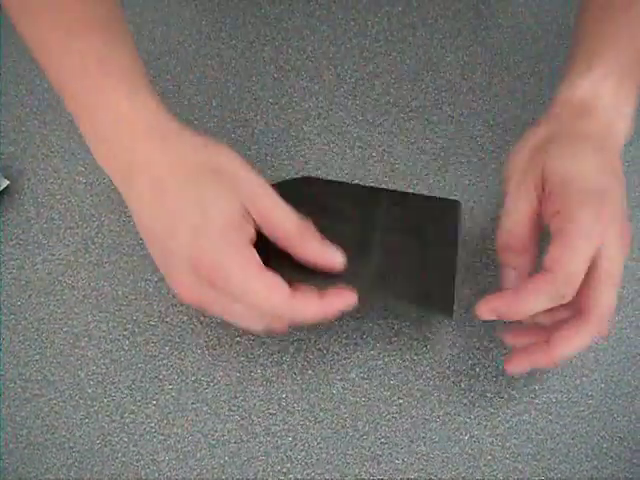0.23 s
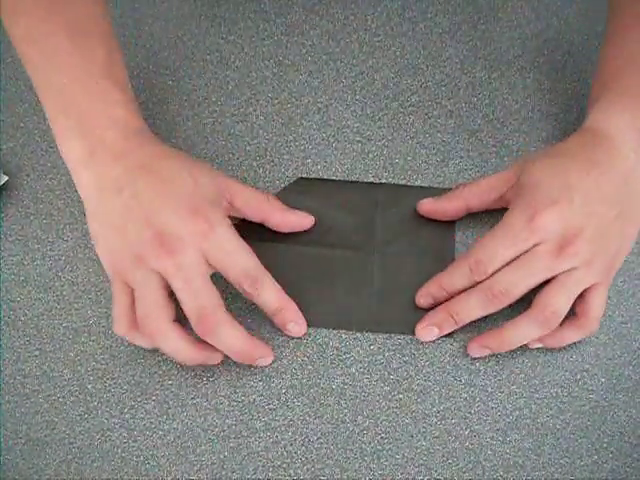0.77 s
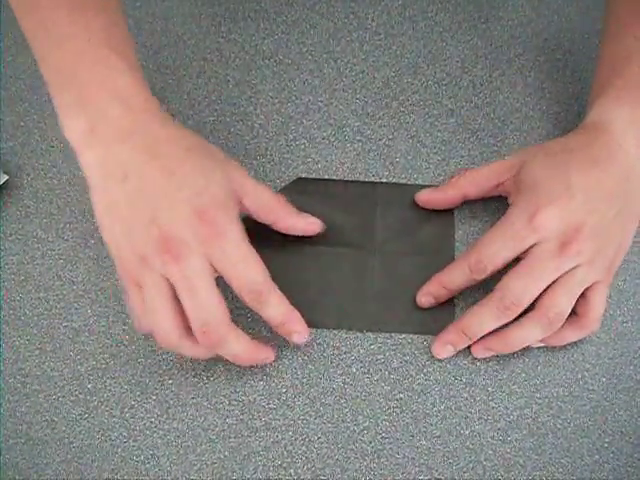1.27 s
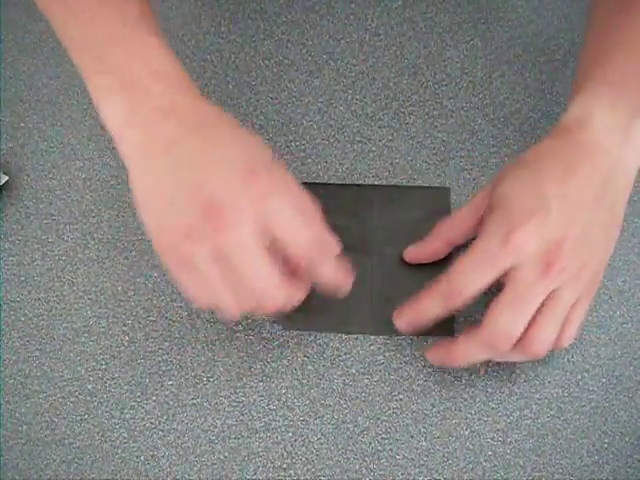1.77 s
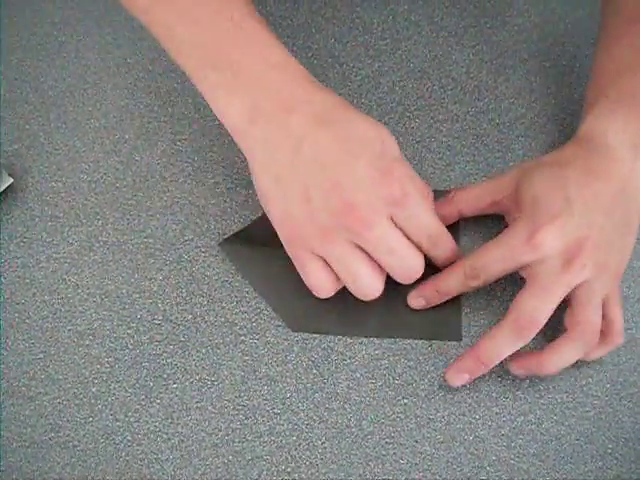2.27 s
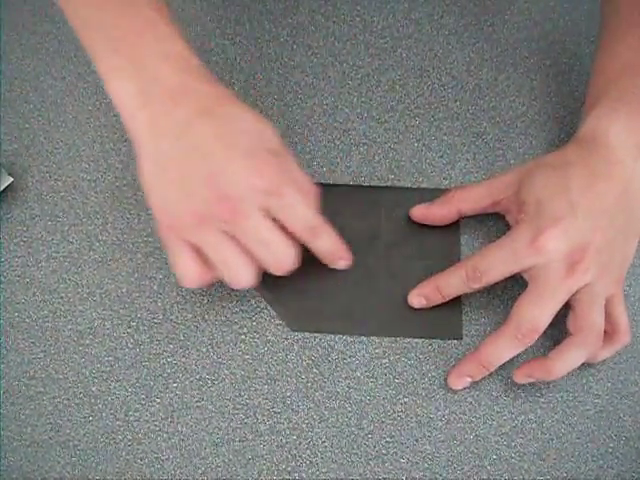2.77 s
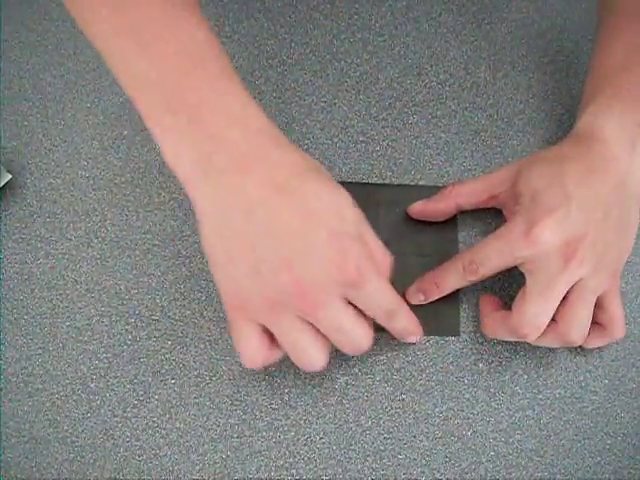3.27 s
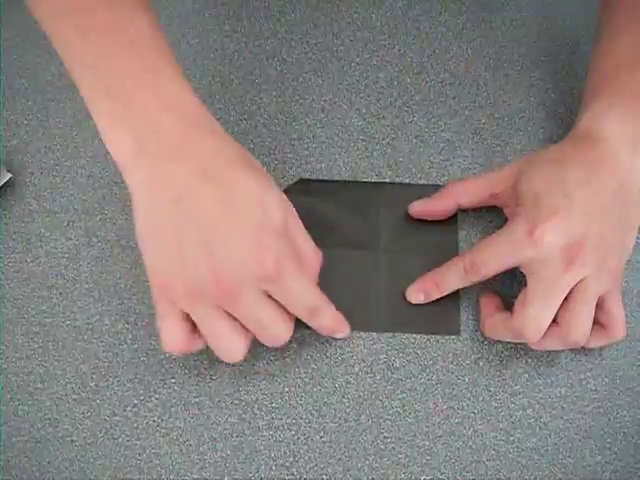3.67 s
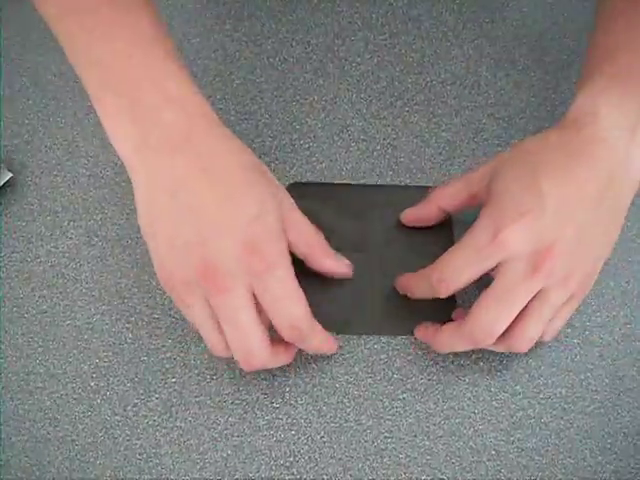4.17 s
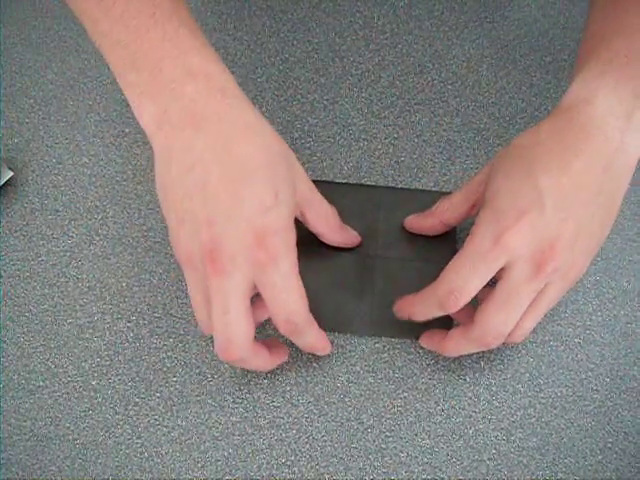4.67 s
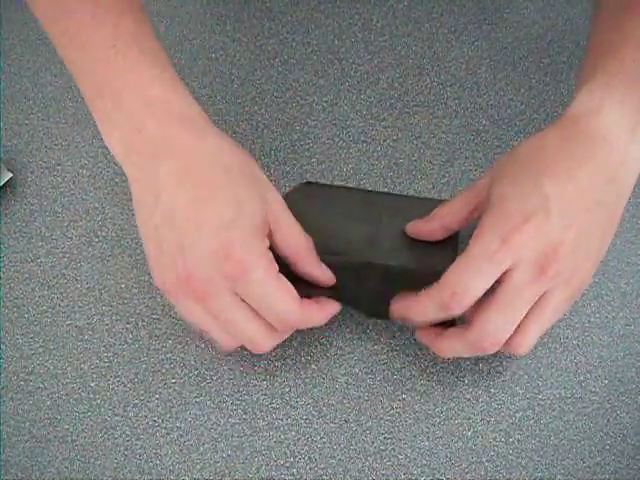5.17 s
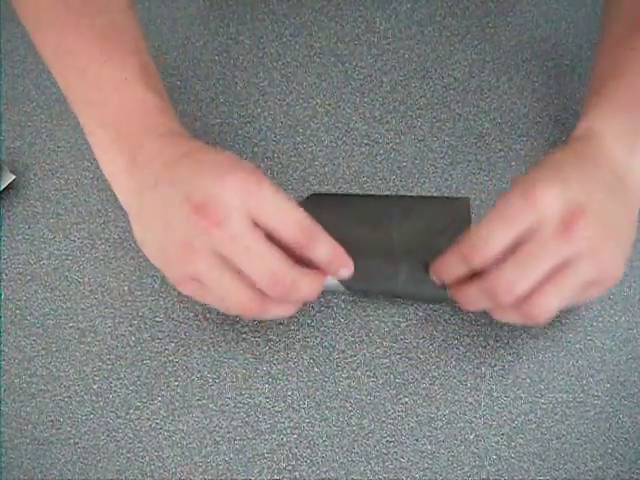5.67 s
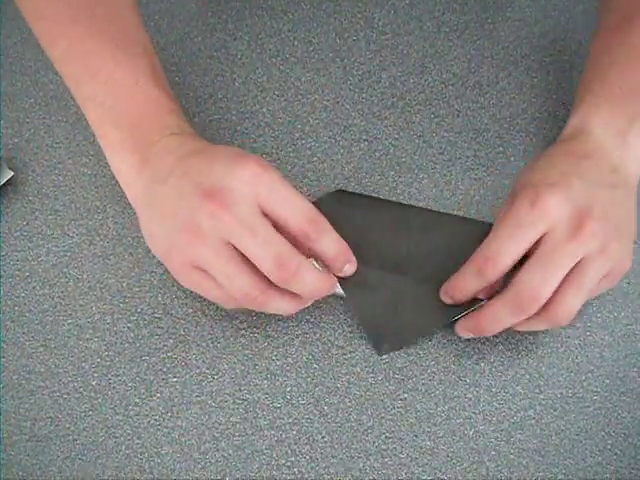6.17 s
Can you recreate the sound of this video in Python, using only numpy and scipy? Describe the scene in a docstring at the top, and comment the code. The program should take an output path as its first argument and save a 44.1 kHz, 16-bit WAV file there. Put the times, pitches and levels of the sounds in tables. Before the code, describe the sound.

In a quiet room, close to a small, dull-sounding microphone, foil-backed paper slides and crinkles under the fingers. One much louder crackling stroke comes early as a fold is pressed flat. After a lull with scattered ticks, the sheet is handled again with gentle scuffs and small snaps. Steady hiss, soft bumps and a low drone swelling about once a second lie underneath.

```python
"""A quiet room, at a table: hands fold a small sheet of foil-backed paper near a dull little microphone.
Stick-slip friction makes the sheet scuff as it is turned and lifted, and its facets buckle with a snap.
A fingertip flattens a crease in one loud crackling stroke, driving the resonances of the sheet.
Under it lie a steady hiss, soft bumps and a low drone that swells about once a second."""
import sys
import numpy as np
from scipy import signal
from scipy.fft import rfft, irfft, next_fast_len
from scipy.io import wavfile
from scipy.ndimage import uniform_filter1d

SR = 44100
rng = np.random.default_rng(int(sys.argv[2]) if len(sys.argv) > 2 else 0)


def put_to_file(sound):
    """Save the sound as 16-bit audio at rate SR, in the file named by the first command-line argument."""
    columns = np.atleast_2d(sound).T  # one column per channel
    safe = np.clip(columns, -1, 1)
    whole_steps = np.round(safe * 32767)
    wavfile.write(sys.argv[1], SR, whole_steps.astype(np.int16))


N = 283210
TIME = np.arange(N) / SR

# Levels in the tables are relative: each source applies its own further gain.
# spectrum of the background noise: frequency_hz, gain_db
ROOM_SPECTRUM = [(10, 25.5), (30, 18), (70, 12.5), (170, 10), (500, 4), (1000, 1.5), (2000, -2),
                 (4000, -2.5), (5000, -6.5), (5600, -1), (6500, -16)]
# slides of the sheet under the fingers: start_s, length_s, level_db, fade_db, pitch_hz, width_hz
SLIDES = [ (0.0, 0.13, -31.5, 6, 3300, 600), (0.12, 0.13, -36.5, 10, 2900, 2400),
          (0.293, 0.27, -38.5, 1.5, 3400, 2160), (0.63, 0.088, -41, 6, 3670, 1600),
          (1.82, 0.29, -45.5, -1, 3200, 3000), (3.505, 0.67, -53.5, 5, 3800, 1210),
          (4.215, 0.16, -41.5, 3, 3700, 1500), (4.52, 0.3, -42, 6.5, 3730, 1100),
          (4.821, 0.23, -42, -1, 2820, 1400), (5.196, 0.091, -32.5, 15.5, 2270, 447),
          (5.316, 0.4, -37, 8.5, 3314, 1500), (5.806, 0.096, -40.5, 0, 4300, 1100),
          (5.965, 0.32, -44.5, 3.5, 3650, 1710)]
# spectrum of the papery friction hiss: frequency_hz, gain_db
FRICTION_SPECTRUM = [(300, -21.5), (900, -3), (1700, 8.5), (4200, 2), (6500, 2)]
# large facets of the foil buckling: start_s, level_db, pitch_hz, width_hz, decay_s
LARGE_FACETS = [ (0.1, -13, 3200, 990, 0.012), (0.2905, -16, 2600, 3000, 0.0027),
                (0.3195, -18.5, 2880, 1600, 0.0022), (0.325, -12.5, 2900, 1600, 0.0018),
                (0.384, -13.5, 2050, 1400, 0.00073), (0.5166, -24, 2900, 2200, 0.0022),
                (1.2865, -9, 1900, 2200, .0013), (1.3057, 1, 2300, 2000, 0.0011),
                (1.81, -17.5, 4360, 1400, .0015), (1.931, -28, 3900, 1500, .002),
                (1.991, -20, 3400, 1400, .0013), (2.0437, -19, 4050, 1200, 0.00068),
                (2.048, -18.5, 4400, 1200, 0.0014), (3.025, -20, 3900, 1400, 0.00082),
                (4.6023, -26, 3950, 700, .0015), (4.67, -29, 3900, 1000, .003),
                (4.785, -26.5, 3750, 900, 0.0023), (4.9313, -15, 3260, 2180, 0.0023),
                (4.9404, -20, 3700, 1490, 0.0016), (5.1776, -25, 2800, 1300, .0008),
                (5.1924, -16.5, 2530, 1200, .0013), (5.213, -21, 2750, 700, .003),
                (5.3018, -12.5, 3020, 380, 0.00047), (5.3718, -19.5, 4130, 1100, 0.0012),
                (5.58, -20.5, 4200, 1000, 0.0018), (6.0684, -26, 2650, 500, 0.0014),
                (6.1645, -30.5, 3970, 805, .004), (6.2225, -28, 3600, 1620, 0.0044)]
# spectral weighting of every snap: frequency_hz, gain_db
SNAP_SPECTRUM = [(300, -16), (900, -8.5), (1700, 2.5), (3000, 4), (4300, 0), (6500, -2)]
# swells of the drone: start_s, length_s, level_db
DRONE_SWELLS = [(0.55, 0.37, -33), (1.59, 0.44, -34), (2.644, 0.47, -36.5), (3.549, 0.48, -34.5),
                (4.554, 0.43, -33.5)]
# resonances of the drone: pitch_hz, width_hz, gain_db
DRONE_RESONANCES = [(85.7, 18.6, 2), (109, 23.5, 0.5), (186, 87, -10), (305, 225, -19.5)]
# fingertip pushes on the crease (light, firmer, hard): start_s, length_s, level_db, fade_db, treble_db
FINGER_PUSHES = [(0.917, 0.193, -34.5, 0.5, -6.5), (1.114, 0.145, -26, 0, -9),
                 (1.26, 0.59, -9, 31.5, -13.5)]
# resonances of the sheet pressed on the table: pitch_hz, width_hz, gain_db, growth_db_per_push_db
SHEET_RESONANCES = [(232, 183, -12, 0), (790, 470, -12.5, 0.3), (1582, 485, -1.5, -0.08), (2120, 620, 0, 0),
                    (2920, 480, -3, 0), (3550, 630, -2, 0), (4200, 670, -8.5, 0.7)]
# frequency response of the microphone: frequency_hz, gain_db
MICROPHONE_RESPONSE = [(4600, -0.5), (5050, -2), (5550, -18), (6000, -8), (6300, -12), (6700, -17.5),
                       (7100, -36)]


def undb(db):
    """The decibel scale: 20 dB is a tenfold amplitude."""
    return 10 ** (np.asarray(db) / 20)


def unit(x):
    """Normalisation to an rms of one."""
    return x / np.sqrt(np.mean(x ** 2))


def add(track, start_s, sound):
    """Superposition: a sound sums into the track from start_s on."""
    start = max(int(start_s * SR), 0)
    track[start:start + len(sound)] += sound[:N - start]


def colour(x, spectrum):
    """Minimum-phase filtering: folding the cepstrum of a gain curve makes it causal."""
    size = 2 * next_fast_len(len(x))
    hz, db = np.transpose(spectrum)
    freqs = np.maximum(np.arange(size // 2 + 1) * SR / size, 1)
    gain = undb(np.interp(np.log(freqs), np.log(hz), db))
    cepstrum = irfft(np.log(gain))
    cepstrum[1:size // 2] *= 2
    cepstrum[size // 2 + 1:] = 0
    return irfft(rfft(x, size) * np.exp(rfft(cepstrum)))[:len(x)]


def ring(x, pitch_hz, width_hz):
    """Second-order resonance, with a gain of one at its centre."""
    return signal.lfilter(*signal.iirpeak(pitch_hz, pitch_hz / width_hz, fs=SR), x)


def steep_ring(x, pitch_hz, width_hz):
    """Resonators in cascade: two wider ones give the same bandwidth with steeper skirts."""
    wider_hz = width_hz / np.sqrt(np.sqrt(2) - 1)
    return ring(ring(x, pitch_hz, wider_hz), pitch_hz, wider_hz)


def flicker(rate_hz):
    """Random modulation: a line through rate_hz random values a second, at unit rms."""
    knots = rng.standard_normal(N // 64)
    return unit(np.interp(TIME * rate_hz, np.arange(len(knots)), knots))


def slips(rate_hz, spread_db):
    """Stick-slip friction as a Poisson train of impulses: mostly small, a few large."""
    happens = rng.random(N) < rate_hz / SR
    force = undb(spread_db * np.minimum(rng.exponential(size=N), 5))
    return happens * force * rng.choice([-1, 1], N)


def stroke(length_s, fade_db, edge_s):
    """Exponential decay by fade_db over length_s, with a linear attack and release."""
    t = np.arange(int((length_s + edge_s) * SR)) / SR
    edges = np.clip(np.minimum(t, t[-1] - t) / edge_s, 0, 1)
    return edges * undb(-fade_db * t / length_s)


def room_noise(level_db=-36):
    """Stationary broadband noise: a steady hiss over a soft rumble."""
    return undb(level_db) * unit(colour(rng.standard_normal(N), ROOM_SPECTRUM))


def scuffs(hiss_db=2.0, flicker_db=2.74):
    """Sliding friction: slips excite a resonance of the free part of the sheet, over a papery hiss."""
    out = np.zeros(N)
    force = slips(rate_hz=1800, spread_db=2.5)
    hiss = unit(colour(force, FRICTION_SPECTRUM))
    for start_s, length_s, level_db, fade_db, pitch_hz, width_hz in SLIDES:
        envelope = undb(level_db) * stroke(length_s, fade_db, edge_s=0.0052)
        start = int(start_s * SR)
        span = slice(start, start + len(envelope))
        ringing = unit(steep_ring(force[span], pitch_hz, width_hz))
        add(out, start_s, envelope * unit(ringing + undb(hiss_db) * hiss[span]))
    # the fingers catch and slip, so the sliding is never even
    return out * undb(flicker_db * flicker(rate_hz=70) + 0.54)


def small_facets(chances=130, above_slide_db=5, width_hz=800, decay_s=0.0017):
    """Random buckling during slides: rows like LARGE_FACETS whose level follows the slide's."""
    moments = (np.arange(chances) + rng.random(chances)) / chances * TIME[-1]
    rows = []
    for moment_s, (level_scatter, pitch_scatter) in zip(moments, rng.standard_normal((chances, 2))):
        for start_s, length_s, level_db, fade_db, *_ in SLIDES:
            if start_s < moment_s < start_s + length_s:
                slide_db = level_db - fade_db * (moment_s - start_s) / length_s
                snap_db = slide_db + above_slide_db - 0.5 * level_scatter
                pitch_hz = 3860 + 400 * pitch_scatter
                rows.append((moment_s, snap_db, pitch_hz, width_hz, decay_s))
    return rows


def crinkles(flutter_s=0.007, room_decay_s=0.059, gain_db=-2.5):
    """Snap-through buckling: a facet rings briefly, its neighbours settle, the room answers faintly."""
    out = np.zeros(N)
    t = np.arange(SR // 6) / SR
    tail = undb(-18) * np.exp(-t / flutter_s) + undb(-31) * np.exp(-t / room_decay_s)
    for start_s, level_db, pitch_hz, width_hz, decay_s in list(LARGE_FACETS) + small_facets():
        force = rng.standard_normal(len(t)) * (np.exp(-t / decay_s) + tail)
        force[0] += 1.5  # the opening click
        paper_body = undb(-14) * steep_ring(force, pitch_hz=1890, width_hz=530)
        foil_edge = undb(-11) * steep_ring(force, pitch_hz=4000, width_hz=250)
        snap = colour(ring(force, pitch_hz, width_hz) + paper_body + foil_edge, SNAP_SPECTRUM)
        peak_rms = np.sqrt(uniform_filter1d(snap ** 2, size=88).max())  # the loudest 2 ms
        add(out, start_s, undb(level_db) * snap / peak_rms)
    return undb(gain_db) * out


def bumps(level_db=-36, lead_s=0.032):
    """Gated low-frequency noise: a dull thud just before each swell starts and just before it ends."""
    envelope = np.zeros(N)
    thud = undb(level_db) * stroke(length_s=0.067, fade_db=2.5, edge_s=0.012)
    for start_s, length_s, _ in DRONE_SWELLS:
        add(envelope, start_s - lead_s, thud)
        add(envelope, start_s + length_s - lead_s, thud)
    return envelope * unit(steep_ring(rng.standard_normal(N), pitch_hz=45, width_hz=55))


def drone():
    """Amplitude modulation of narrow-band noise: a rough drone near 100 Hz swells and sinks."""
    rumble = sum(undb(gain_db) * steep_ring(rng.standard_normal(N), pitch_hz, width_hz)
                 for pitch_hz, width_hz, gain_db in DRONE_RESONANCES)
    envelope = np.zeros(N)
    for start_s, length_s, level_db in DRONE_SWELLS:
        add(envelope, start_s, undb(level_db) * stroke(length_s, fade_db=6, edge_s=0.05))
    return unit(rumble) * envelope


def crease(push_floor_db=-40, crossover_hz=4100, treble_lift_db=4.5, flicker_db=1.0, gain_db=-1.0):
    """Modal excitation: fibres and foil yield under the fingertip in a crackle that rings the sheet."""
    push, treble_envelope = np.zeros(N), np.zeros(N)
    for start_s, length_s, level_db, fade_db, treble_db in FINGER_PUSHES:
        envelope = undb(level_db) * stroke(length_s, fade_db, edge_s=0.013)
        add(push, start_s, envelope)
        add(treble_envelope, start_s, undb(treble_db) * envelope)
    push_db = 20 * np.log10(np.maximum(push, undb(push_floor_db)))
    push_db -= push_db.max()
    shared_slips = slips(rate_hz=3400, spread_db=0.5)
    sheet = np.zeros(N)
    for pitch_hz, width_hz, mode_db, growth in SHEET_RESONANCES:
        # each mode is also driven by slips of its own; a hard push shifts the balance of the modes
        force = shared_slips + slips(rate_hz=3000, spread_db=2.0)
        sheet += undb(mode_db + growth * push_db) * steep_ring(force, pitch_hz, width_hz)
    dull = signal.sosfiltfilt(signal.butter(4, crossover_hz, fs=SR, output="sos"), sheet)
    bright = sheet - dull
    crackle = push * unit(dull) + undb(treble_lift_db) * treble_envelope * unit(bright)
    return crackle * undb(flicker_db * flicker(rate_hz=90) + gain_db)


def scene():
    """Linear superposition of all the sources at the table, in one channel."""
    return (crease() + scuffs() + drone() + bumps() + room_noise() + crinkles())[None]


def record(dry):
    """Band limiting and saturation: the microphone dips above 5 kHz; the recorder clips and low-passes."""
    heard = colour(dry[0], MICROPHONE_RESPONSE)
    clipped = np.clip(heard, -0.9, 0.9)
    cutoff_hz = 7100
    low_pass = signal.ellip(8, 0.05, 50, cutoff_hz, fs=SR, output="sos")
    return signal.sosfiltfilt(low_pass, clipped)[None]


dry = scene()
out = record(dry)
put_to_file(out)
```